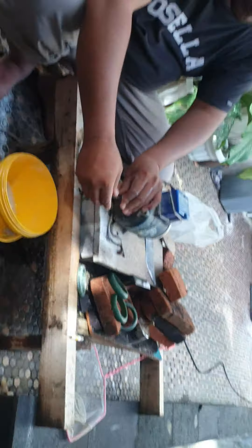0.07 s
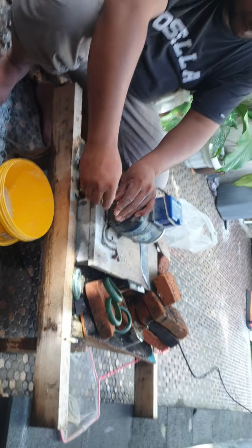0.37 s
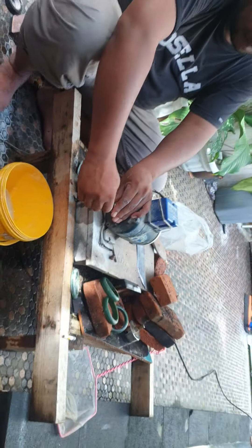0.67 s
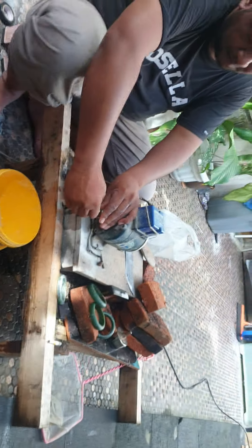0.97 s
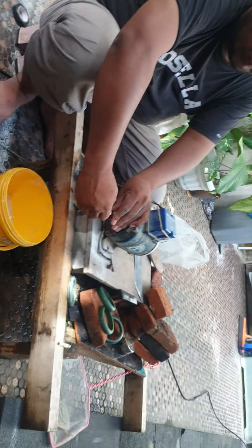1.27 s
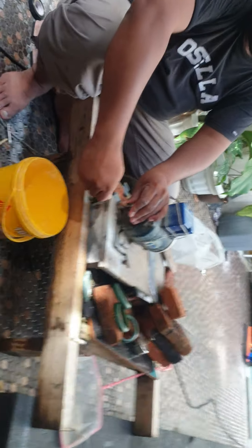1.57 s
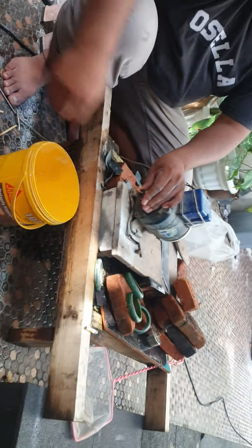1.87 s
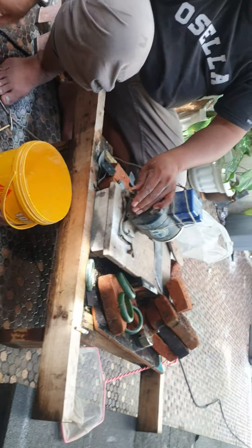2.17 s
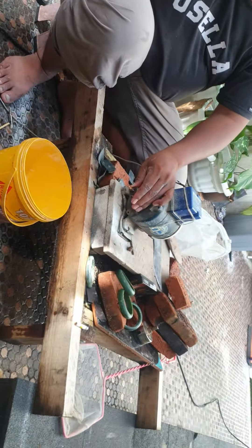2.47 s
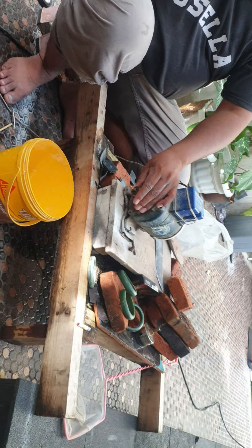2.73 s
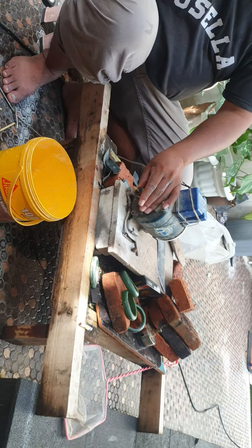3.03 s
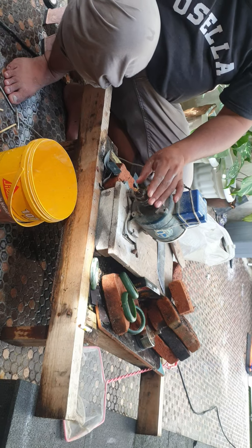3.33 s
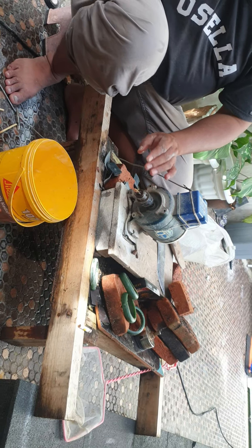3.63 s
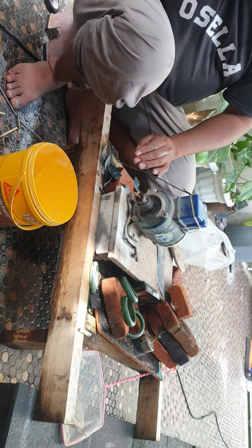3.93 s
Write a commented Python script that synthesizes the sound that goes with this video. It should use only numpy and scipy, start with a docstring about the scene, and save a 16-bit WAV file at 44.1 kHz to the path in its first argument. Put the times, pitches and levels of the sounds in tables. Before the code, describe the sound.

Loud microphone handling bumps and scrapes give way to a faint grinding machine outdoors.

```python
"""Outdoors, two microphones near a small grinding machine; a hand holds work to the wheel, softly hissing.
In the first second fingers shift on the recorder's case: loud scrapes, creaks and knocks, right at the
microphones. Then the work takes a few broad strokes, with light scratches, and the motor's hum comes up.
From 2.7 s comes a quickening run of thin ticks, like a bouncing chip, then two light clacks farther off.
Machine rumble and a quiet wash of air lie under it all."""
import sys
import numpy as np
from scipy import signal
from scipy.fft import rfft, irfft
from scipy.io import wavfile
from scipy.ndimage import uniform_filter1d

SR = 44100
rng = np.random.default_rng(int(sys.argv[2]) if len(sys.argv) > 2 else 0)


def to_wav(sig):
    """Store sig (one row per channel, or 1-D mono) as 16-bit WAV at the path in sys.argv[1].

    Samples outside -1..1 are clipped; the rate is SR.
    """
    pcm = np.clip(np.atleast_2d(sig), -1, 1) * 32767
    pcm = np.round(pcm).astype(np.int16)
    wavfile.write(sys.argv[1], SR, pcm.T)  # frames by channels


N = 176400
T = np.arange(N) / SR
GRAIN_HZ, HISS_GRAIN_DB, GRIND_RIGHT_DB = 450, 1.1, -11

# work rubbing on the wheel, at the left microphone: t/s, level/dB
GRIND_LEVEL = [(0, -63.5), (.78, -64.5), (1.06, -66.5), (1.2, -69), (1.33, -60.5), (1.5, -65),
               (1.61, -72.5), (1.65, -61.5), (1.8, -64), (2.2, -63.5), (2.4, -68.5), (2.6, -75.5),
               (2.78, -70), (3.15, -76), (3.31, -68.5), (3.48, -75), (3.56, -73.5), (3.9, -74.5)]
# broad strokes across the wheel: peak t/s, rise/s, fall/s, level/dB
STROKES = [(1.09, 0.18, 0.074, -53.5), (1.305, 0.046, 0.072, -53), (1.9, 0.098, 0.096, -65)]
# spectra of the rubbing and of the strokes: f/Hz, level/dB
GRIND_SPECTRUM = [(900, -10.5), (1800, -3.5), (2600, -3), (3300, -9), (4300, -3), (6200, -2), (8300, -18.5),
                  (11000, -5), (16000, -47)]
STROKE_SPECTRUM = [(300, -7.5), (600, 2), (2400, -7), (3300, -11), (5500, -13.5), (8300, -21)]

def grinding():
    """Off to the left, work rubs on the wheel: a fine friction hiss, fuller on each stroke."""
    grain = amp(HISS_GRAIN_DB * wander(GRAIN_HZ))
    pressure = sum(amp(db) * swell(peak, rise, fall) for peak, rise, fall, db in STROKES)
    rubbing = curve(GRIND_LEVEL) * noise_pair(GRIND_SPECTRUM, grain)
    strokes = pressure * noise_pair(STROKE_SPECTRUM, grain)
    return pair(0, GRIND_RIGHT_DB) * (rubbing + strokes)


# motor hum, before each microphone's gain: t/s, level/dB
HUM_LEVEL = [(0.95, -65.5), (1.5, -55), (1.54, -61), (1.83, -58.5), (1.86, -52), (2.62, -53.5), (2.78, -49),
             (3.06, -58.5), (3.13, -55), (3.17, -61.5), (3.38, -51.5), (3.52, -64), (3.66, -52), (4.0, -56)]

def motor_hum(hz=102.8, octave_db=-26, waver_db=0.34):
    """The motor's mains hum wavers in phase and level, stronger at the right microphone."""
    phase = 2 * np.pi * hz * T + 0.4 * wander(4)
    tone = np.sqrt(2) * (np.sin(phase) + amp(octave_db) * np.sin(2 * phase))
    return pair(-4.5, 3) * tone * curve(HUM_LEVEL) * amp(waver_db * wander(22))


# spectrum of a click on the case: f/Hz, level/dB
CLICK_SPECTRUM = [(200, 20.5), (1000, 10), (2600, 4.5), (4500, -6.5), (6500, -8.5), (8300, -26),
                  (11500, -13.5), (16000, -36)]
# hollow ring of the case: f/Hz, level/dB, decay/s
CASE_MODES = [(646, -23.5, 0.0046), (1300, -31, 0.0049), (2490, -29.5, 0.0045)]

def case_hit(hz, click_db, cycles, sag=0.3, click_s=0.00036, size=4096):
    """One hit on the case: a damped thud whose pitch sags, and a sharp click with a hollow ring."""
    t = T[:size]
    dying = np.exp(-hz * t / cycles)
    pitch = hz * (1 - sag * (1 - dying))
    thud = np.sin(2 * np.pi * np.cumsum(pitch) / SR) * dying
    burst = (t == 0) + 0.31 * rng.standard_normal(size) * np.exp(-t / click_s)
    click = colour(burst, CLICK_SPECTRUM)
    ring = sum(amp(db) * np.sin(2 * np.pi * f * t) * np.exp(-t / decay) for f, db, decay in CASE_MODES)
    return -thud - amp(click_db) * (click / abs(click).max() + ring)


# knocks on the case: t/s, left/dB, right/dB, f/Hz, click over thud/dB, decay/cycles
KNOCKS = [(.0476, -66, -39.5, 700, 11.5, 0.41), (0.0548, -50, -10, 93, -6, 0.76),
          (0.1124, -41, -17.5, 257, -14, 0.78), (.1924, -50, -22, 597, 11, 0.37),
          (0.2119, -23.5, -20.5, 333, 3.5, 0.44), (0.3193, -10, 0, 330, -20, 0.34),
          (0.4834, -33.5, -33.5, 450, 10, 0.34), (0.5694, -48, -43, 500, 11, 0.45),
          (0.5797, -21.5, -28.5, 271, 5.5, 0.62), (0.6865, -40, -19.5, 110, -6, 0.31),
          (0.6985, -44, -23, 220, -4.5, 0.37), (0.7257, -29, -22, 280, -15, 0.76),
          (0.7453, -47, -31, 83, -13, 1.5), (0.8712, -47, -29, 150, -17, 1.24),
          (0.8966, -54, -31.5, 82.4, -29, 0.99), (1.2941, -56, -52, 396, 14, 0.28),
          (1.3141, -40.5, -43.5, 439, 3.5, 0.79), (1.3352, -36, -33.5, 59.3, -32, 1.9),
          (1.5565, -49, -41.5, 300, -27, 0.77), (1.5935, -58, -40, 323, -20, 0.65),
          (1.8772, -39.5, -38, 134, -40, 4.5), (2.247, -48, -40, 320, -22, 0.9),
          (2.6745, -51, -41, 328, -16, 0.72)]

def knocks():
    """Fingers knock on the case, right at the microphones."""
    out = np.zeros((2, N))
    for s, left_db, right_db, hz, click_db, cycles in KNOCKS:
        hit = np.array([case_hit(hz, click_db, cycles) for side in "LR"])
        add(out, s, pair(left_db, right_db) * hit)
    return out


# creaks of the grip: t/s, length/s, slip rate/Hz, left/dB, right/dB
CREAKS = [(.003, .04, 172, -71, -25.5), (0.252, .06, 73, -36, -25), (0.43, .04, 110, -43, -31),
          (0.516, .046, 70, -37, -37)]

def creaks(jitter=0.08, spread_db=2.5):
    """Skin sticks and slips on the case, each slip a small hit in a quick, uneven run."""
    out = np.zeros((2, N))
    for start, length, rate, left_db, right_db in CREAKS:
        for k, (late, strength) in enumerate(rng.standard_normal(size=(12, 2))):
            slip = amp(spread_db * strength) * case_hit(hz=300, click_db=-10.5, cycles=0.45)
            if k / rate < length:
                add(out, start + (k + jitter * late) / rate, pair(left_db, right_db) * slip)
    return out


# finger scrapes: peak t/s, rise/s, fall/s, left/dB, right/dB, drag over rasp/dB
SCRAPES = [(.062, 0.017, 0.03, -72, -45, 2.5), (0.115, 0.0041, 0.021, -56, -37, 0),
           (.175, 0.026, 0.029, -48.5, -32, 5), (0.227, 0.015, 0.016, -46, -33.5, -3.5),
           (0.269, 0.016, 0.026, -52.5, -39.5, 3.5), (0.317, 0.0077, 0.042, -60, -45, 7),
           (.465, 0.019, 0.019, -57.5, -51.5, 3.5), (0.531, 0.014, 0.0062, -49, -48, -1),
           (.553, 0.0053, 0.012, -50, -49, 1), (0.615, 0.0039, .03, -51, -50.5, 5.5),
           (0.695, 0.021, 0.0085, -37.5, -45, -1.5)]
# spectra of the rasp at each microphone and of the low drag: f/Hz, level/dB
RASP_LEFT = [(350, -49.5), (600, 5), (812, 6), (1190, -9.5), (1530, -8), (1780, 1), (2150, -5.5),
             (2800, -3), (3040, -1.5), (4050, -8), (5400, -7.5), (7940, -23.5), (11200, -15), (14900, -18),
             (16000, -30)]
RASP_RIGHT = [(350, -21), (600, 1.5), (931, 2), (1040, 1.5), (1230, 2.5), (1800, -1), (2830, -3.5),
              (4050, -8.5), (6030, -13), (8270, -41), (11700, -29), (15100, -36), (16000, -11)]
DRAG_SPECTRUM = [(60, -8.5), (150, 0), (270, 3.5), (470, 0.5), (620, -10.5), (1000, -37), (2000, -41.5)]

def scrapes(grain_db=1.5):
    """Fingers drag over the case beside the microphones: a grainy rasp over low friction noise."""
    grain = amp(grain_db * wander(GRAIN_HZ))
    rasp = gritty(np.array([noise(RASP_LEFT, grain), noise(RASP_RIGHT, grain)]))
    drag = noise_pair(DRAG_SPECTRUM, grain)
    out = np.zeros((2, N))
    for peak, rise, fall, left_db, right_db, drag_db in SCRAPES:
        out += pair(left_db, right_db) * swell(peak, rise, fall) * (rasp + amp(drag_db) * drag)
    return out


# flexing of the case, at the right microphone: t/s, level/dB
FLEX_LEVEL = [(0, -56), (.09, -35), (.2, -35), (.33, -35), (.4, -42.5), (.45, -40.5), (.55, -40.5),
              (.64, -46.5), (.76, -37.5), (.85, -82), (1, -68), (4, -58)]
# its spectrum: f/Hz, level/dB
FLEX_SPECTRUM = [(25, -21), (55, 6.5), (110, -0.5), (180, -11), (400, -37.5), (1000, -47)]

def case_flex():
    """The case flexes under the grip with a deep rumble, mostly on the right."""
    return pair(-19, 0) * curve(FLEX_LEVEL) * noise_pair(FLEX_SPECTRUM)


# slides of skin: peak t/s, rise/s, fall/s, left/dB, right/dB
SLIDES = [(.165, 0.042, 0.044, -47.5, -40), (.345, .04, 0.066, -53.5, -76), (.447, 0.01, 0.028, -49, -59),
          (0.638, .018, 0.006, -48.5, -73), (0.664, 0.0079, 0.012, -36.5, -62),
          (1.05, .18, 0.18, -66, -67.5), (1.38, 0.067, 0.1, -58.5, -71), (1.73, 0.062, 0.18, -58.5, -71),
          (2.3, .2, 0.15, -65.5, -74), (2.715, 0.012, 0.18, -60, -72), (3.32, .05, 0.051, -66, -80),
          (3.545, .008, 0.035, -68, -83)]
# their spectrum: f/Hz, level/dB
SLIDE_SPECTRUM = [(1500, -65), (3500, -34), (5000, -54), (6300, -2), (8300, -11), (10000, -1.5),
                  (11800, 2.5), (13500, -1.5), (15800, -2.5)]

def skin_slides():
    """Skin slides smoothly close to the microphones with a high hiss; overlaps add in power."""
    grain = amp(HISS_GRAIN_DB * wander(GRAIN_HZ))
    power = sum((pair(left_db, right_db) * swell(peak, rise, fall)) ** 2
                for peak, rise, fall, left_db, right_db in SLIDES)
    return np.sqrt(power) * noise_pair(SLIDE_SPECTRUM, grain)


# thin ticks: t/s, level/dB
TICKS = [(2.704, -43), (2.7751, -40.5), (2.836, -40), (2.8948, -45.5), (2.9413, -50), (2.983, -52)]
# their spectrum: f/Hz, level/dB
TICK_SPECTRUM = [(2500, -33), (5000, -24), (6500, -7), (8300, -24), (10500, 2.5), (12500, 7.5),
                 (15800, 1.5)]

def ticks():
    """Well to the left, bright ticks quicken and fade like a bouncing chip."""
    return pair(0, -16) * small_hits(TICKS, TICK_SPECTRUM, direct_s=0.0012, tail_s=0.017, tail_db=-9.5)


# light scratches: t/s, level/dB
SCRATCHES = [(1.633, -48), (1.6573, -45), (3.542, -55)]

def scratches():
    """Short, dry scratches from the wheel's side, coloured like its hiss."""
    hits = small_hits(SCRATCHES, GRIND_SPECTRUM, direct_s=0.0011, tail_s=0.0088, tail_db=-16)
    return pair(0, GRIND_RIGHT_DB) * hits


# distant clacks: t/s, level/dB
CLACKS = [(3.277, -45), (3.786, -58.5)]
# their spectrum: f/Hz, level/dB
CLACK_SPECTRUM = [(300, -25), (600, -2), (950, 6.5), (1400, -0.5), (2200, -2.5), (3200, -21), (6300, -29),
                  (9000, -51)]

def clacks():
    """Hollow clacks farther off, a little left, arrive with strong reflections."""
    hits = small_hits(CLACKS, CLACK_SPECTRUM, direct_s=0.0017, tail_s=0.068, tail_db=-4.5, rise_s=0.001)
    return pair(0, -5) * hits


# spectrum of the machine's rumble: f/Hz, level/dB
RUMBLE_SPECTRUM = [(20, -18), (40, -1.5), (60, 2.5), (110, 3.5), (170, -10), (300, -28.5), (800, -48)]

def machine_rumble():
    """Steady low noise of the machine, partly common to both microphones, stronger on the right."""
    common = noise(RUMBLE_SPECTRUM)
    sides = np.array([common + share * noise(RUMBLE_SPECTRUM) for share in (1.04, 0.94)])
    return pair(-67, -53) * unit_rms(sides)


# outdoor wash: t/s, level/dB
AIR_LEVEL = [(0, -53.5), (.9, -58.5), (1.55, -60.5), (1.95, -57.5), (2.5, -61), (3.15, -61), (4, -62)]
# its spectrum, and the further colouring at the right microphone: f/Hz, level/dB
AIR_SPECTRUM = [(100, -25), (170, -11), (263, -2.5), (301, -8), (493, -13), (532, -3), (631, -9), (735, -4),
                (808, -12), (941, -9), (1080, -13), (1250, -10.5), (1730, -20.5), (2170, -22.5),
                (2440, -21.5), (2630, -27), (5620, -49.5), (7920, -68), (16000, -21.5)]
AIR_RIGHT = [(170, 0.5), (350, -1), (700, -11.5), (1400, -9), (3000, 0), (8000, 11), (16000, -18)]

def air():
    """Open air all around: a quiet, wavering wash with weaker mids on the right."""
    level = curve(AIR_LEVEL) * amp(wander(4.5))
    return level * np.array([noise(AIR_SPECTRUM), colour(noise(AIR_SPECTRUM), AIR_RIGHT)])


def small_hits(hits, spectrum, direct_s, tail_s, tail_db, rise_s=0.0001):
    """Each hit is a short burst of noise, then a tail of scattered reflections."""
    envelope = np.zeros(N)
    for s, db in hits:
        t = np.maximum(T - s, 0)
        attack = 1 - np.exp(-t / rise_s)
        decay = np.exp(-t / direct_s) + amp(tail_db) * np.exp(-t / tail_s)
        envelope += amp(db) * attack * decay
    return envelope * noise_pair(spectrum)


def gritty(x, patchy_db=3.0, size=512):
    """The contact keeps shifting, so narrow resonances flare up and vanish."""
    spectra = signal.stft(x, nperseg=size)[2]
    patches = unit_rms(uniform_filter1d(rng.standard_normal(spectra.shape), size=2, axis=1))
    return unit_rms(signal.istft(spectra * amp(patchy_db * patches), nperseg=size)[1][:, :N])


def amp(db):
    """Decibels to gain."""
    return 10 ** (np.asarray(db) / 20)


def pair(left_db, right_db):
    """Gains of the two microphones."""
    return amp([[left_db], [right_db]])


def unit_rms(x):
    """Scales to rms 1."""
    return x / np.sqrt(np.mean(x ** 2) + 1e-20)


def curve(points):
    """Gain over time from (t/s, level/dB) points."""
    return amp(np.interp(T, *np.transpose(points)))


def colour(x, points, size=4096):
    """Minimum-phase filter through (f/Hz, level/dB) points."""
    hz, db = np.transpose(points)
    bin_hz = abs(np.fft.fftfreq(size, 1 / SR))
    log_gain = np.log(amp(np.interp(np.log(bin_hz + 1), np.log(hz + 1), db)))
    taps = np.fft.ifft(np.exp(np.conj(signal.hilbert(log_gain)))).real[:size // 2]
    return signal.fftconvolve(x, taps)[:len(x)]


def wander(rate_hz):
    """Smooth random drift of rms 1."""
    rolloff = 1 + (np.fft.rfftfreq(N, 1 / SR) / rate_hz) ** 2
    return unit_rms(irfft(rfft(rng.standard_normal(N)) / rolloff, N))


def noise(spectrum, grain=1):
    """Coloured noise of rms 1, optionally clumped into grains."""
    return unit_rms(colour(rng.standard_normal(N) * grain, spectrum))


def noise_pair(spectrum, grain=1):
    """A separate noise for each microphone."""
    return np.array([noise(spectrum, grain) for side in "LR"])


def swell(peak, rise, fall):
    """Bell-shaped stroke with its own rise and fall."""
    return np.exp(-((T - peak) / np.where(T < peak, rise, fall)) ** 2 / 2)


def add(mix, s, sound):
    """Mixes a sound in at s seconds."""
    part = mix[:, max(round(s * SR), 0):][:, :sound.shape[-1]]
    part += sound[..., :part.shape[1]]


def scene():
    """All sources at the two microphones."""
    handling = knocks() + creaks() + scrapes() + case_flex() + skin_slides()
    machine = grinding() + motor_hum() + machine_rumble()
    return handling + machine + ticks() + scratches() + clacks() + air()


def record(dry, low_cut_hz=38, edge_hz=15780):
    """Low cut of the microphones, then the band limit."""
    low_cut = signal.butter(N=3, Wn=low_cut_hz, btype="high", fs=SR, output="sos")
    band_limit = signal.firwin(511, edge_hz, window=("kaiser", 9), fs=SR)
    return signal.oaconvolve(signal.sosfilt(low_cut, dry), band_limit[None], "same")


dry = scene()
out = record(dry)
to_wav(out)
```